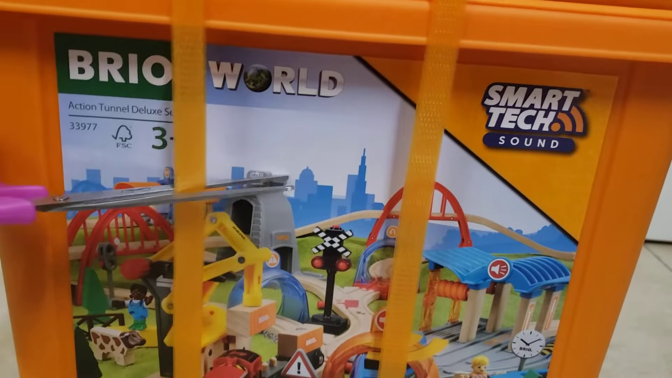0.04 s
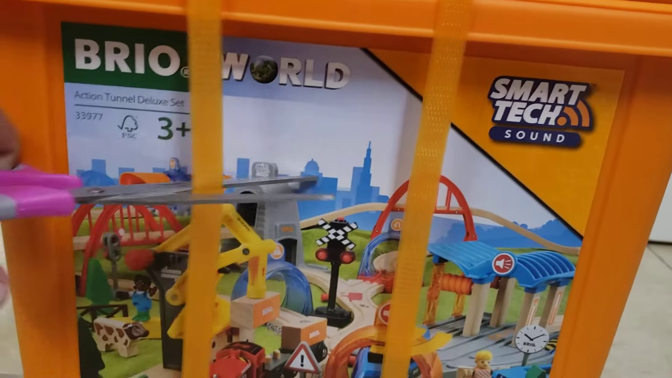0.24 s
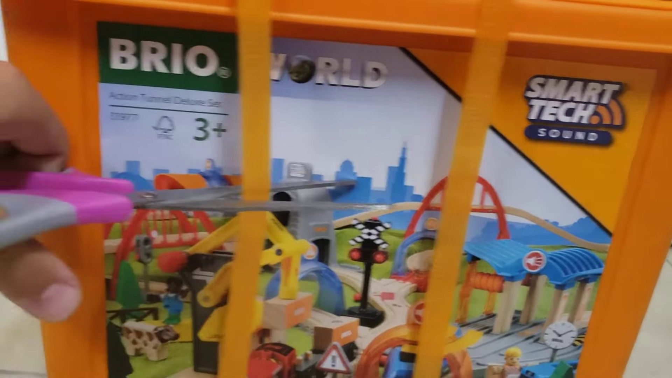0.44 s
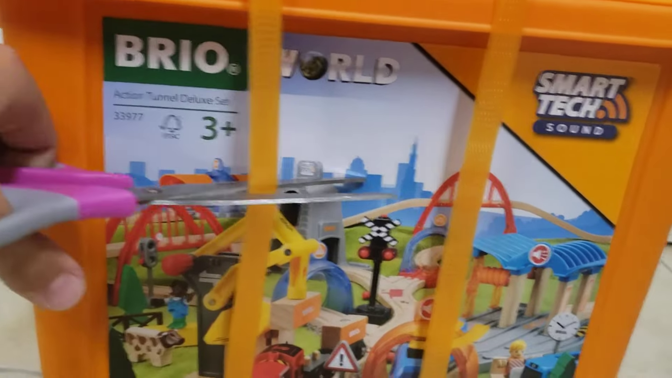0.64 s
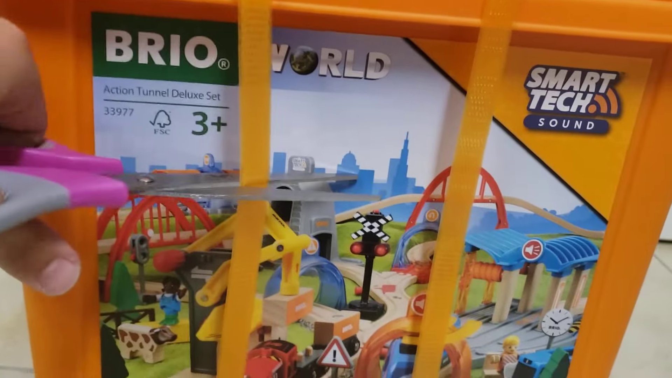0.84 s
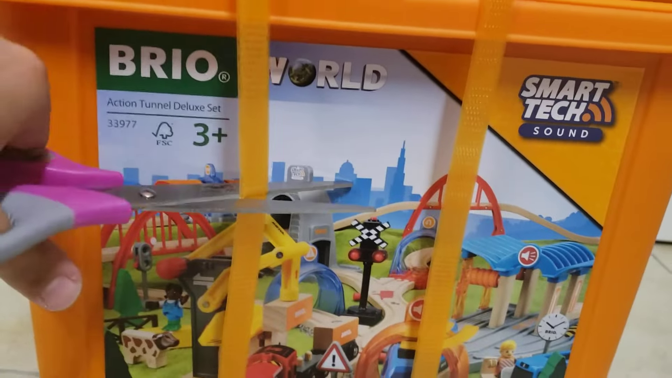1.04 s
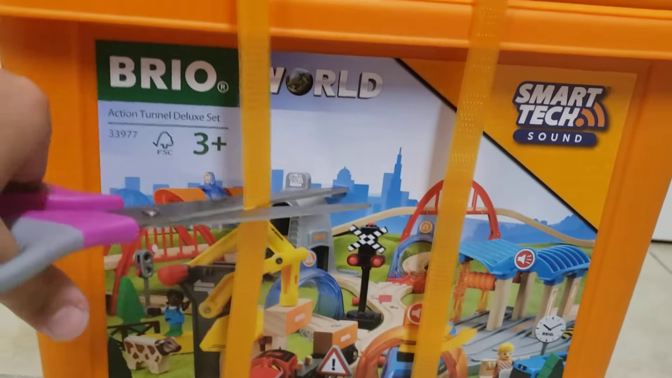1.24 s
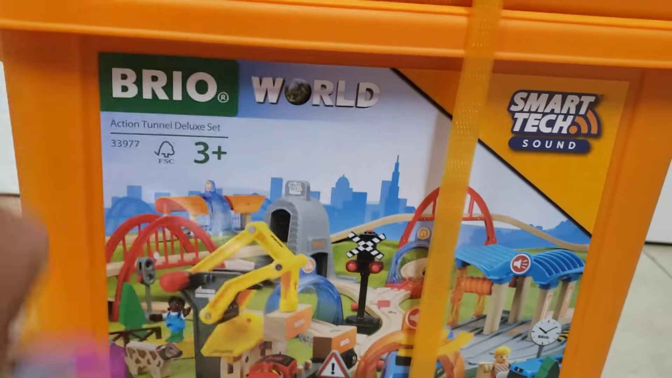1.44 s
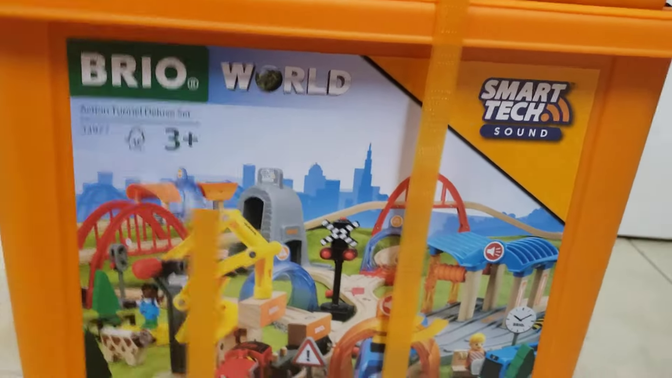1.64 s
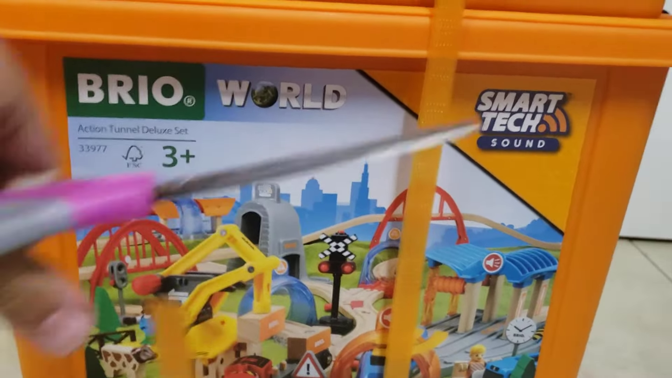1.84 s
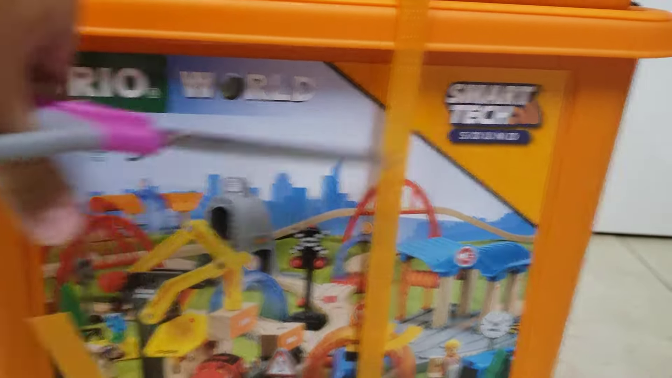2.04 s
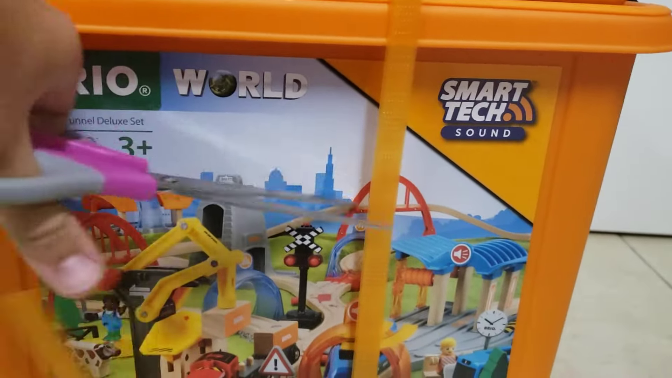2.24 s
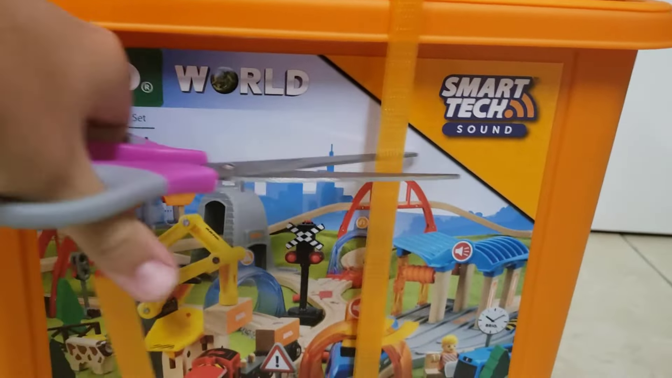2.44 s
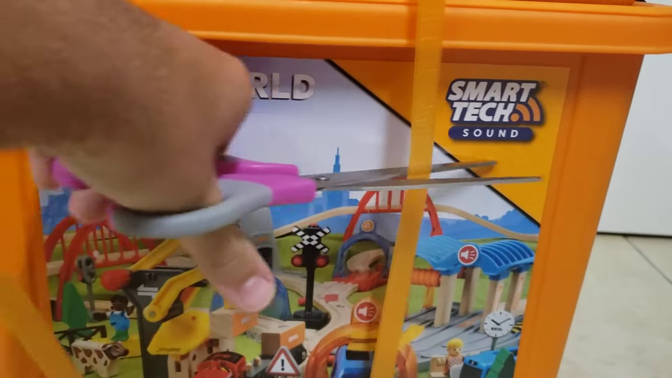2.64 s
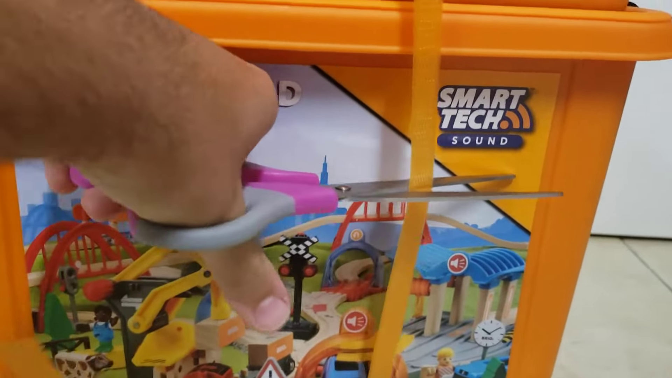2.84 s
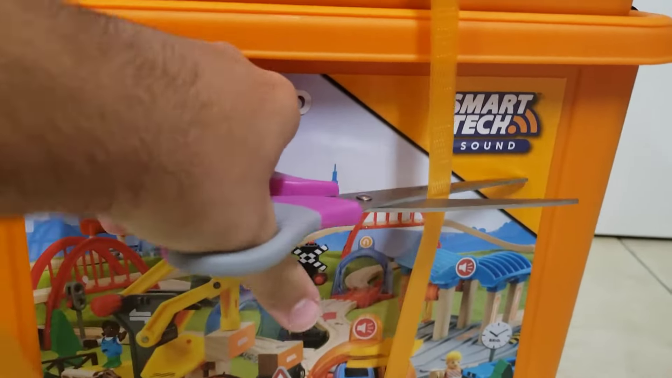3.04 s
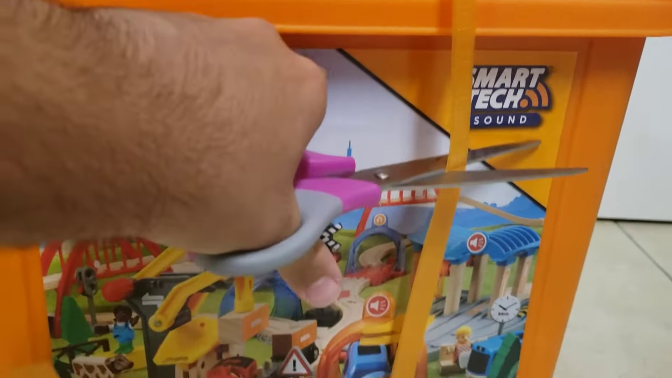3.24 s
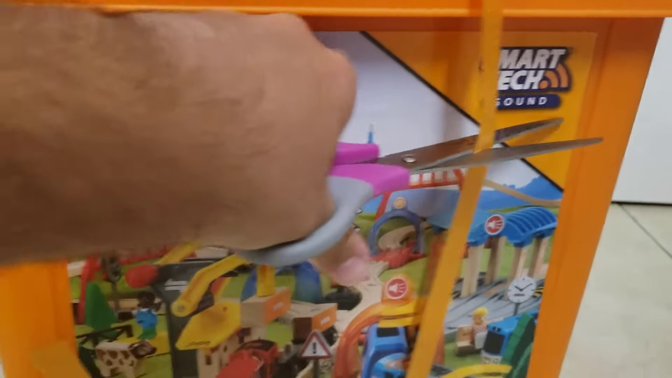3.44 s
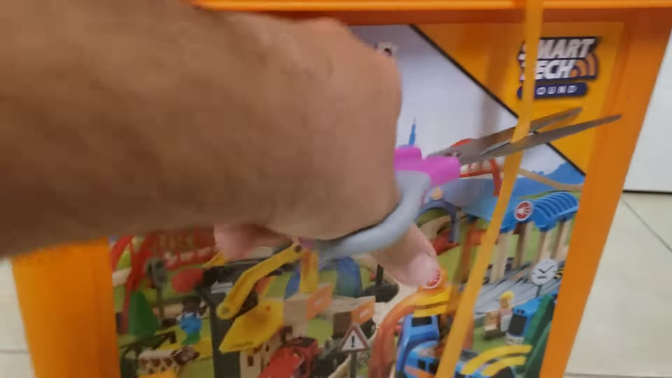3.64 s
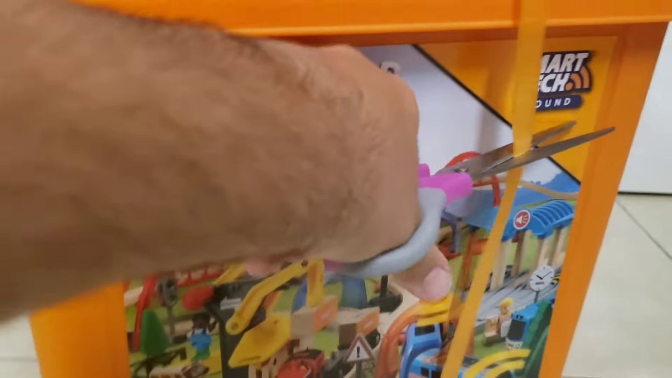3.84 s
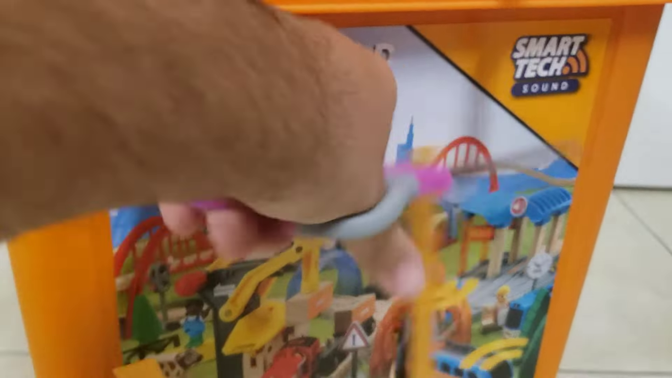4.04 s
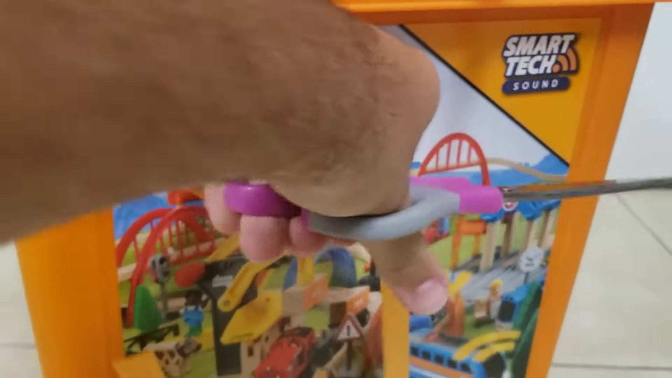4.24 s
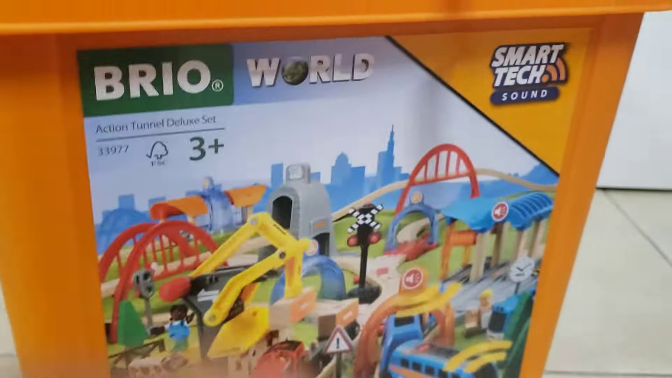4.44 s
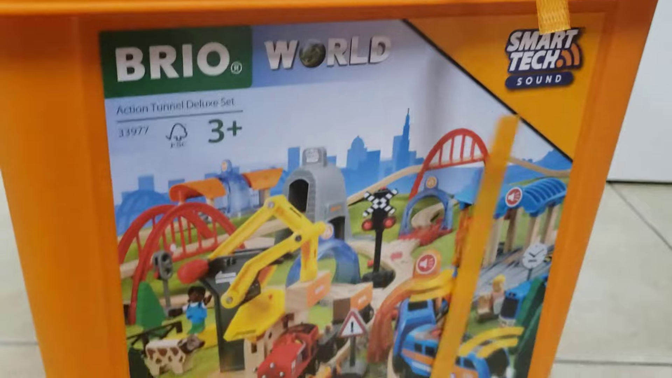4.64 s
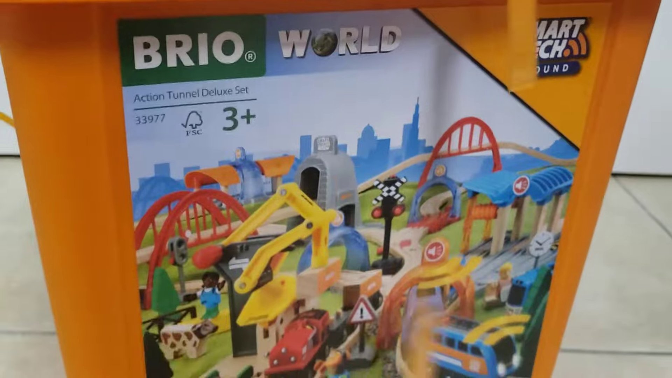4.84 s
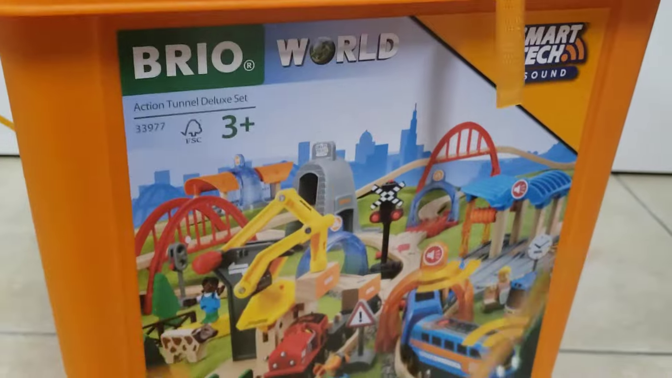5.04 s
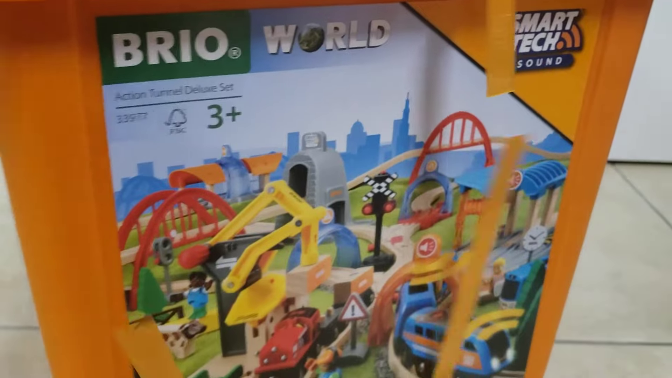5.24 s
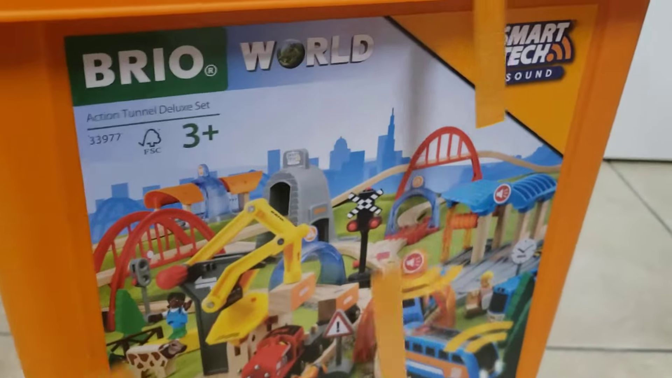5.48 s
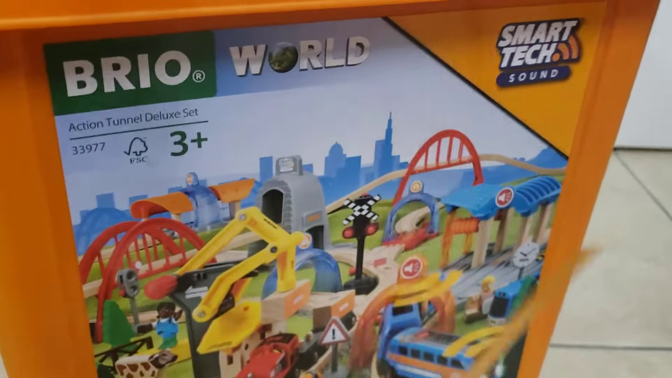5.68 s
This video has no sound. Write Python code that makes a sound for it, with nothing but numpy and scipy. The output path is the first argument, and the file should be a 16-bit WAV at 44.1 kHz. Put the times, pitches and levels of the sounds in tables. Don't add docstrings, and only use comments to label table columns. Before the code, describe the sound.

Close stereo phone pickup in a tiled room. Faint hand rubbing and small creaks on a hollow plastic box lead to a very loud strap snap with a low boom. Scissors knock and scrape quietly, a few dull bumps hit the phone, then a second sharp snap cracks. Light ticks follow, and the freed strap end rattles brightly before a soft low thump. Faint hiss continues throughout, stronger at the left.

```python
import sys
import numpy as np
from scipy import signal
from scipy.fft import rfft, irfft
from scipy.io import wavfile
from scipy.ndimage import uniform_filter1d

SR = 44100
rng = np.random.default_rng(int(sys.argv[2]) if len(sys.argv) > 2 else 0)


def materialize(psi):
    bounded = np.clip(np.atleast_2d(psi).T, -1, 1)
    quanta = np.round(bounded * 32767).astype(np.int16)
    wavfile.write(sys.argv[1], SR, quanta)


def voltage_ratio(level):
    return 10 ** (np.asarray(level, float) / 20)


N = 251798

# frequency in Hz, level in dB, t60 in seconds.
PANEL_MODES = [(231, -2.5, 0.16), (300.6, -2, 0.14), (440, 3.5, 0.026), (555.6, -2, 0.13),
               (631.4, 9.5, 0.025), (703, 8.5, 0.029), (892, 16.5, 0.014), (1138, 3, 0.05),
               (1287, -49.5, 0.0083)]
# frequency in multiples of the boom pitch, level in dB.
BOOM_PARTIALS = [(0.701, -20.5), (1.351, -3), (1.902, -7)]

# frequency in Hz, level in dB per Hz.
CRACK_SPECTRUM = [(760, -6), (1300, 8.5), (1520, 4.5), (1910, 10), (2520, 4), (3010, 0.5), (5520, -20.5),
                  (6110, -36.5), (8500, -68.5), (11000, -71), (18700, -120)]
PORT_SPECTRUM = [(5000, -34), (8500, -39), (9160, -35), (10200, -23), (11900, -6), (13500, -7), (15000, -4),
                 (15900, -8.5), (16800, -39.5)]
RUMBLE_SPECTRUM = [(12, -22), (20, -15.5), (49, 3), (86, 2), (123, 2), (204, -2.5), (350, -15),
                   (460, -60.5), (770, -120)]
RUB_SPECTRUM = [(160, -46.5), (280, -17.5), (408, 0), (493, -6.5), (667, -2.5), (811, -9), (1130, -12),
                (1400, -13.5), (1820, -76), (3080, -120)]
RUSTLE_SPECTRUM = [(880, -12), (1500, -13), (2050, -5), (3480, -0.5), (4790, -10.5), (6220, -11.5),
                   (8500, -32), (11000, -78.5), (18700, -120)]
SHUDDER_SPECTRUM = [(300, -22), (480, -10.5), (655, 0.5), (800, -8.5), (980, -4.5), (1220, -4), (1500, -15),
                    (2400, -39.5)]
WHIP_SPECTRUM = [(1200, -15.5), (1830, -4.5), (2300, -4), (3500, -2.5), (4500, -5), (5600, -10.5),
                 (6700, -13.5), (7400, -62)]
HISS_SPECTRUM = [(180, -39.5), (393, -30), (1100, -28.5), (1300, -15), (1520, -2), (1950, -5),
                 (2550, -14.5), (3450, -21.5), (3950, -22.5), (4300, -32), (5200, -40.5), (8570, -49.5),
                 (14900, -33), (16800, -48.5)]
# frequency in Hz, left minus right in dB.
HISS_BALANCE = [(60, 1.0), (110, -19), (200, -6), (380, -5.5), (700, -4), (1290, 11.5), (2380, 17),
                (4400, 11.5), (8120, 0.5), (15000, -3)]
# frequency in Hz, t60 in seconds, level in dB.
ROOM_DECAY = [(150, 0.48, -12), (485, 0.43, -9), (1500, 0.42, -11.5), (4100, 0.63, -3.5),
              (11940, 0.44, -6.5)]

# start in seconds, boom peak in dB, boom pitch in Hz, boom t60 in seconds,
# hardness as panel level above the boom in dB.
SNAPS = [
    (1.433, -2, 171.4, 0.036, -12.5),
    (4.0661, -18, 250, 0.025, 3),
    (5.4790, -21, 136, 0.056, -28),
]
TAPS = [
    (3.8293, -15, 185, 0.027, -28),
    (3.8778, -26.5, 161, 0.027, -37),
    (3.9372, -20, 150, 0.02, -29),
    (3.9944, -24, 129, 0.03, -28.5),
]
FIRST_KNOCKS = [(0.7688, -35, 135.6, 0.065, -36), (0.8052, -37.5, 191, 0.04, -36),
                (1.1221, -20, 178, 0.066, -15.5), (1.1658, -42, 198, 0.1, 0),
                (1.2233, -14, 204, 0.022, -14), (1.3148, -22, 204, 0.081, -9),
                (1.3563, -39.5, 230, 0.073, 3), (1.3808, -28.5, 239, 0.3, 1), (1.4195, -41, 252, 0.058, 8),
                (1.4511, -25, 211.4, 0.28, -4), (1.5788, -23, 182, 0.049, -14),
                (1.6893, -67.5, 230, 0.1, 26), (1.8571, -45, 76.2, 0.11, 4.5),
                (1.9832, -69.5, 74.5, 0.32, 22), (2.1217, -44.5, 199, 0.15, 0.5),
                (2.1771, -20.5, 122, 0.074, -4.5), (2.2115, -22.5, 111.5, 0.018, -6),
                (2.3011, -31.5, 259, 0.021, -9), (2.356, -47, 223.1, 0.088, 6),
                (2.5338, -29, 276, 0.026, -8), (2.6093, -45.5, 240, 0.11, -2),
                (2.7338, -48.5, 202, 0.13, -10.5)]
SECOND_KNOCKS = [(3.2348, -32.5, 111.3, 0.1, -9.5), (3.3262, -22, 171, 0.061, -14),
                 (3.3733, -21.5, 185, 0.046, -8), (3.4783, -22, 200, 0.066, -4),
                 (3.5416, -30, 200, 0.089, -0.5), (3.6342, -25.5, 118, 0.12, -7.5),
                 (3.6468, -25.5, 120.3, 0.14, -18), (3.6543, -42.5, 120, 0.079, 5),
                 (4.067, -5.5, 115.8, 0.081, -15.5)]
TOUCHES = [(3.7538, -40.5, 92.6, 0.13, -24), (3.7905, -50.5, 81, 0.092, 6.5), (3.9605, -51, 73, 0.12, 0.5),
           (4.2618, -35, 158, 0.12, -12.5), (4.3378, -39, 171, 0.15, -10), (4.4252, -46, 79, 0.17, -6.5),
           (4.5498, -44, 73.5, 0.13, -15.5), (4.6768, -49, 111, 0.15, -2.5),
           (5.0428, -27, 72.6, 0.027, -39), (5.5195, -34, 99.4, 0.16, -30),
           (5.6068, -44.5, 230, 0.05, -7.5)]
CREAKS = [(1.068, -62.5, 200, 0.039, 3), (1.1143, -59, 200, 0.044, 9), (1.2165, -56, 200, .05, 13),
          (1.2545, -39.5, 200, .05, 2), (1.309, -50, 200, .05, 11.5), (1.3348, -45, 200, .05, 8),
          (1.3765, -50.5, 200.3, 0.0554, 10.5), (2.716, -47.5, 191, 0.2, -12),
          (2.803, -48.5, 200, 0.11, -17), (2.832, -50.5, 200, 0.094, -8), (2.856, -47, 216, 0.29, -8),
          (2.915, -46.5, 200.6, 0.079, -20), (3.11, -61.5, 200, 0.047, 12.5), (3.272, -63.5, 184, .05, 16),
          (3.2998, -61.5, 190, .05, 7), (3.32, -43, 151.7, 0.059, -3.5), (3.365, -54, 190, 0.053, 1),
          (3.4648, -57, 190, .05, 9), (3.4755, -65, 190, 0.045, 11), (3.5385, -50, 190, 0.052, 13),
          (3.6305, -50, 190, 0.046, 11.5), (3.693, -54, 190, 0.052, 10), (4.0632, -27.5, 249, 0.04, 2.5),
          (0.168, -48, 201, 0.076, -2), (0.2, -42, 402, .08, -13), (0.298, -50.5, 290, 0.075, -6),
          (1.4238, -35.5, 252, .04, 11), (1.462, -25, 279, 0.19, -17), (2.322, -53.5, 220, .05, 7),
          (2.336, -51.5, 220, 0.048, 8), (4.477, -58, 199.7, 0.051, 2), (5.53, -49.5, 486, 0.092, 1.5),
          (5.562, -53.5, 300, 0.082, -7), (3.821, -40.5, 260, .03, -16), (3.868, -43, 200, 0.033, -18),
          (4.0035, -30, 170, 0.034, -22), (2.128, -44, 260, .04, -9), (4.135, -32, 105.4, 0.18, -22),
          (1.19, -46.5, 200, .05, 0.5), (3.608, -36.5, 180, .06, -19.5), (3.29, -54, 190, .05, 3.5)]

# start in seconds, treble peak in dB, body above treble in dB, length in ms.
FIRST_TICKS = [(1.1221, -40, -10, 0.75), (1.2233, -49.5, 3, 2.3), (1.3153, -61, 8, 1.3),
               (1.38, -40, -2, 1.4), (1.4192, -57, 7, 1.2), (1.4241, -37, -13, 4.3),
               (1.4281, -47.5, 6, 0.94), (1.4334, 0, -4.5, 0.62), (1.4405, -25.5, 6, 3),
               (1.8526, -43.5, 2.5, 0.88), (2.1113, -51, 19.5, 1.2), (2.1238, -46, -1, 0.74),
               (2.1317, -66.5, 14, 1.4), (2.1774, -42.5, 10.5, 0.57), (2.2118, -52.5, 15.5, 0.61),
               (2.3456, -52, 15.5, 2.1), (2.3974, -61, 24.5, .5), (2.6038, -45.5, 1, 2.4),
               (2.7836, -46, -4, 0.33)]
SECOND_TICKS = [(3.3741, -49, 3, 0.38), (3.4789, -41.5, -0.5, 1.3), (3.5437, -34, 0.5, 0.55),
                (3.6186, -39, 2, .5), (3.635, -38, 2, 1.3), (3.7906, -50.5, 7, 1.0), (3.8245, -54, 8, 1.6),
                (3.8298, -33.5, -3, 0.31), (3.9371, -41.5, -9, 1.1), (3.9606, -45.5, -8, .5),
                (3.9348, -54, 8, 0.46), (3.9498, -48, 2, .5), (3.6112, -51, 3, 0.43),
                (4.0663, -3, -9, 0.38), (4.0722, -25, 1, 2.2), (4.2621, -29, -3.5, 1.2),
                (4.339, -35.5, 2, 0.76), (4.4232, -37, -6, .5), (4.4447, -48.5, 4, 0.36),
                (4.5228, -39, 8.5, 0.52), (4.6757, -39, -4, 0.62), (4.7101, -47.5, 5.5, 1.4),
                (4.8073, -49.5, -5, .5)]
# start in seconds, treble peak in dB, body above treble in dB.
RATTLE = [(5.0484, -16.5, -7.5), (5.0571, -30, 3.5), (5.0608, -24, -10), (5.0811, -30, 7.5),
          (5.0866, -37.5, 12), (5.093, -10, -12), (5.1025, -22, -14), (5.107, -34, -11), (5.127, -4, -9.5),
          (5.1354, -28, -7), (5.138, -38, -9), (5.1555, -1.5, -16), (5.1642, -23, -12), (5.1642, -8, -11),
          (5.1727, -19.5, 2), (5.188, -23, -0.5), (5.1936, -20, -6), (5.2016, -27, -6),
          (5.2086, -17.5, -8.5), (5.217, -33, -15), (5.2502, -38, -1), (5.2664, -31.5, 7),
          (5.2732, -24, -5), (5.2776, -10, -22.5), (5.2797, -13.5, -14.5), (5.2796, -26.5, -29),
          (5.285, -23.5, -8), (5.2904, -40, -13), (5.2954, -25.5, -5), (5.3196, -21.5, -1.5),
          (5.3224, -20.5, -5), (5.3251, -25.5, -13), (5.3301, -40, -15), (5.3372, -35, -3),
          (5.3459, -20, -15), (5.3473, -23.5, -21), (5.3698, -22.5, -24), (5.3756, -27, -6.5),
          (5.3914, -28, 1.5), (5.432, -23.5, -26), (5.441, -34, -16), (5.446, -47.5, -14),
          (5.6104, -44, -8), (5.6995, -46, 5)]
# start in seconds, frequency in Hz, peak in
# dB, t60 in seconds.
SQUEAKS = [(2.177, 323, -19, 0.015), (3.633, 675, -22, 0.025), (4.0662, 2980, -10.5, 0.011),
           (4.0661, 4100, -18, 0.0063), (1.4405, 3000, -23, 0.008), (2.1785, 3150, -32, 0.008),
           (2.212, 2700, -37, 0.006), (3.79, 2400, -36.5, 0.009), (4.574, 5000, -49.5, 0.016),
           (4.436, 4300, -56, 0.013), (3.9605, 1700, -43, 0.007), (4.587, 4780, -53, 0.013),
           (4.463, 1160, -44.5, 0.031), (5.1715, 3200, -30, 0.012)]
# start in seconds, peak in dB.
PATTER = [(4.462, -57), (4.484, -47), (4.507, -53), (4.545, -48), (4.595, -57), (4.676, -53.5),
          (4.715, -52.5)]

# start in seconds, level in dB, t60 in seconds, whip above shudder in dB.
SHUDDERS = [(1.436, -33, .32, 1.5), (4.068, -34.5, 0.31, -8), (2.302, -54, .5, -15),
            (4.43, -59.5, 1.2, -10.5), (.44, -70, 1.5, -9.5), (2.87, -70.5, 2.5, -31.5),
            (5.05, -67.5, .3, 8.5), (3.485, -53, .35, -20), (3.65, -54.5, .5, -20.5),
            (2.346, -67, 0.18, 11.5), (3.38, -57.5, .3, -20)]
# moment of most pressure in seconds, rub level in dB,
# rise in seconds, fall in seconds, rumble above rub in dB.
STROKES = [(0.02, -55, 0.59, 0.11, 9.5), (0.2, -54.5, 0.11, 0.11, 10.5), (0.3, -56.5, 0.033, 0.37, 6),
           (0.54, -57, 0.25, 0.31, -5), (0.79, -61, 0.52, 0.017, 14.5), (0.93, -84, 0.22, 0.27, 33),
           (1.068, -75.5, 0.029, .05, 27), (1.288, -52, 0.23, 0.23, 7.5), (1.7, -57, 0.22, 0.19, -11),
           (1.88, -47, 0.046, 0.071, -16.5), (2.2, -67.5, 0.54, 0.29, 21), (2.62, -59.5, 0.74, 0.58, 7.5),
           (3.12, -58.5, 0.21, 0.36, -21), (3.63, -55, 0.32, 0.36, 7.5), (3.85, -74, 0.64, 0.61, 23.5),
           (4.356, -58.5, 0.1, 0.1, 11), (4.432, -56.5, 0.016, 0.22, -6), (4.678, -61.5, 0.012, 0.21, -13),
           (4.83, -66, 0.27, 0.29, 9), (5.098, -60, 0.1, 0.73, -11), (5.38, -80, .06, .06, 23),
           (5.71, -59.5, 0.5, .1, 0)]
# moment of most speed in seconds, rustle level in dB,
# rise in seconds, fall in seconds, sizzle above rustle in dB.
SLIDES = [(0.0, -59.5, .1, 0.045, -11), (0.542, -75.5, 0.12, 0.42, -6), (1.3, -75, 0.57, 0.89, -3),
          (1.7, -62, 0.64, 0.27, -21), (1.88, -63, 0.37, 0.1, -2.5), (2.3, -78, 0.19, 0.81, -6),
          (2.6, -66, 0.16, 0.14, -2), (3.5, -69.5, 0.063, 0.33, -7), (3.69, -65, 0.077, 0.097, -2),
          (3.77, -87, .4, 0.13, 18), (4.356, -62.5, 0.21, 0.063, 1.5), (4.432, -59.5, 0.02, 0.14, 1),
          (4.678, -68.5, 0.03, 0.11, 1), (5.218, -58, 0.093, 0.13, -1), (5.314, -54, 0.15, 0.077, -7),
          (5.71, -63, 0.22, .1, -5)]

WALL_PORTS_DB, CASE_PORTS_DB = (1, -0.3, -3), (-11.5, 5, -11)
SNAP_PORTS_DB = (-1.5, -1, 1.5)
SQUEAK_PORTS_DB = (1, -1.5, -9)
LEFT_LAG = -9
LEAD = 256


def read(table, hz):
    f, v = np.transpose(table)
    return np.interp(np.log(hz + 1), np.log(f), v)


def ring(hz, t60, t):
    return np.sin(2 * np.pi * hz * t) * np.exp(-np.log(1000) * t / t60)


def peak(x, db):
    return x * voltage_ratio(db) / np.max(np.abs(x))


def add(track, s, x):
    i = int(s * SR)
    track[..., i:i + x.shape[-1]] += x[..., :N - i]


def struck(x, table):
    n = x.shape[-1]
    hz = np.fft.rfftfreq(n, 1 / SR) + 1
    low_edge = np.minimum(hz / table[0][0], 1) ** 4
    high_edge = np.minimum(table[-1][0] / hz, 1) ** 60
    gain = voltage_ratio(read(table, hz)) * low_edge * high_edge
    cepstrum = irfft(np.log(gain / np.sqrt(np.mean(gain ** 2))), n)
    cepstrum[1:n // 2] *= 2
    cepstrum[n // 2 + 1:] = 0
    return irfft(rfft(x) * np.exp(rfft(cepstrum)), n)


def burst(length, table):
    t = (np.arange(2048) - LEAD) / SR
    noise = rng.standard_normal((3, 2048))
    noise[0, LEAD] = 9.8
    chatter = 0.62 * np.exp(-np.abs(t) / 0.0033)
    fade = (np.exp(-np.abs(t) / max(length, 1e-4)) + chatter) * (t >= 0)
    ports = struck((noise[0] + 2.35 * noise[1:]) * fade, table)
    click = struck(1. * (t == 0), table)
    room_click = np.sqrt(np.sum(ports ** 2) / 2) * click
    return np.vstack([ports, room_click]) / np.max(np.abs(ports.mean(0)))


def knocks(table, swing, ports_db, damping, crack_db):
    out, t = np.zeros((3, N)), np.arange(SR // 4) / SR
    push = np.hanning(int(0.0016 * SR))
    crack_pan_db = 8 * np.array([[.5], [-.5], [0]])
    for s, db, hz, t60, panel_db in table:
        level_chance, pitch_chance = rng.standard_normal((2, len(PANEL_MODES)))
        t60 = np.clip(t60, .02, .25)
        boom = ring(hz, t60, t)
        for ratio, partial_db in BOOM_PARTIALS:
            boom = boom + voltage_ratio(partial_db) * ring(ratio * hz, 0.54 * t60 * damping, t)
        boom = boom * (1 - 0.67 * np.exp(-t * hz / 0.51))
        panel = 0
        for (f, mode_db, mode_t60), a, c in zip(PANEL_MODES, level_chance, pitch_chance):
            panel = panel + voltage_ratio(mode_db + 3 * a) * ring(f * (1 + .05 * c), mode_t60 * damping, t)
        panel = panel * (1 - 0.74 * np.exp(-t / 0.00066))
        panel = peak(swing * np.convolve(panel, push[::3]), db + panel_db + 7.0)
        add(out, s - .0008, peak(swing * np.convolve(boom, push), db + 0.5))
        add(out[:2], s, panel)
        add(out[2], s, 2.65 * panel[:len(t)] * np.exp(-t / 0.0014))
        crack_gain = voltage_ratio(db + panel_db + crack_db + 3.0 + crack_pan_db)
        add(out, s - LEAD / SR, burst(0.0043, CRACK_SPECTRUM) * crack_gain)
    return out * voltage_ratio(np.array(ports_db))[:, None]


def box_blows():
    snaps = knocks(SNAPS, 1, SNAP_PORTS_DB, 0.93, crack_db=4)
    taps = knocks(TAPS, -1, CASE_PORTS_DB, 1.0, crack_db=7.5)
    first = knocks(FIRST_KNOCKS, -1, WALL_PORTS_DB, 0.96, crack_db=-5.5)
    second = knocks(SECOND_KNOCKS, -1, WALL_PORTS_DB, 0.96, crack_db=-12.5)
    touches = knocks(TOUCHES, -1, WALL_PORTS_DB, 0.96, crack_db=3.5)
    creaks = knocks(CREAKS, 1, WALL_PORTS_DB, 0.61, crack_db=-8)
    return snaps + taps + first + second + touches + creaks


def ticks():
    out = np.zeros((3, N))
    rattle = [(*row, 0.49) for row in RATTLE]
    for table, place_db in (FIRST_TICKS, 1), (SECOND_TICKS, -2), (rattle, 7):
        for s, db, body_db, ms in table:
            pan_db = place_db + 0.074 * body_db
            length = ms / 1000
            sides = voltage_ratio(np.array([[pan_db], [-pan_db], [0]]) / 2)
            add(out, s - LEAD / SR, burst(length, PORT_SPECTRUM) * voltage_ratio(db - 3.5) * sides)
            add(out, s - LEAD / SR, burst(6.8 * length, RUSTLE_SPECTRUM) * voltage_ratio(db + body_db - 8.5) * sides)
    return out


def squeaks():
    out, t = np.zeros((3, N)), np.arange(2048) / SR
    patter = [(s, 675, db - 0.5, 0.037) for s, db in PATTER]
    for s, hz, db, t60 in SQUEAKS + patter:
        rough = 1 + 0.1 * 5 * uniform_filter1d(rng.standard_normal(len(t)), size=40)
        onset = np.clip(t / (0.098 * t60), 0, 1)
        mode = peak(ring(hz, t60, t) * onset * rough, db) * voltage_ratio(np.array(SQUEAK_PORTS_DB))[:, None]
        add(out[0], s - LEFT_LAG / SR, mode[0])
        add(out[1:], s, mode[1:])
    return out


def colour(x, table):
    hz = np.fft.rfftfreq(x.shape[-1], 1 / SR)
    gain = voltage_ratio(read(table, hz)) * (hz >= table[0][0]) * (hz <= table[-1][0])
    return irfft(rfft(x) * gain / np.sqrt(np.mean(gain ** 2)), x.shape[-1])


def pair(alike):
    mid, side = rng.standard_normal((2, N))
    alike = np.clip(alike, 0, 1)
    return np.sqrt((1 + alike) / 2) * mid + np.sqrt((1 - alike) / 2) * side * np.array([[1], [-1]])


def flicker(rate, db):
    k = int(SR / rate)
    steps = np.repeat(rng.standard_normal(N // k + 1), k)[:N]
    return voltage_ratio(db * uniform_filter1d(steps, k))


def grains(rate, spread_db):
    noise = pair(.3)
    slips = (rng.random(N) < rate / SR) * voltage_ratio(spread_db * rng.exponential(size=N))
    x = noise + slips * pair(.4) * 3
    return x / np.sqrt(np.mean(x ** 2))


def shudders():
    t = np.arange(N) / SR
    wall = whip = 0
    for s, db, t60, whip_db in SHUDDERS:
        fade = voltage_ratio(db - 60 * np.abs(t - s) / max(t60, .05)) * np.clip((t - s) / .004, 0, 1)
        wall = wall + fade
        whip = whip + fade * voltage_ratio(whip_db)
    wall_noise = colour(wall * flicker(60, 3.0) * grains(250, 3.0), SHUDDER_SPECTRUM)
    whip_noise = colour(whip * flicker(90, 2.5) * grains(700, 2.5), WHIP_SPECTRUM)
    return wall_noise + whip_noise


def swells(table):
    t = np.arange(N) / SR
    first = second = 0
    for s, db, rise, fall, above_db in table:
        distance = np.where(t < s, (s - t) / max(rise, .01), (t - s) / max(fall, .01))
        swell = voltage_ratio(db - 20 * distance)
        first = np.maximum(first, swell)
        second = np.maximum(second, swell * voltage_ratio(above_db))
    return first, second


def motion():
    rub, rumble = swells(STROKES)
    rustle, sizzle = swells(SLIDES)
    rumble = np.maximum(rumble, voltage_ratio(-61))
    hand = rumble * flicker(14, 3.0) * colour(pair(.93), RUMBLE_SPECTRUM)
    hand = hand + rub * flicker(22, 2.5) * colour(grains(150, 3.8), RUB_SPECTRUM)
    strap = rustle * colour(grains(599, 1.4), RUSTLE_SPECTRUM)
    return hand + strap + sizzle * colour(grains(400, 2.7), PORT_SPECTRUM)


def room():
    t, tail = np.arange(SR) / SR, 0
    f, t60, db = np.transpose(ROOM_DECAY)
    for hz in 60 * 2. ** np.arange(9):
        band = [hz / 2 ** .5, min(hz * 2 ** .5, .45 * SR)]
        sos = signal.butter(2, band, "band", fs=SR, output="sos")
        decay = read(list(zip(f, t60)), hz)
        level_db = read(list(zip(f, db)), hz)
        noise = signal.sosfilt(sos, pair(.98 - hz / 2500)[:, :SR])
        tail = tail + noise * voltage_ratio(level_db - 60 * t / decay) / np.sqrt(decay * SR / 14)
    early = 1 + voltage_ratio(9.5) * np.exp(-t / 0.0063)
    return tail * np.clip(t / 0.0078, 0, 1) * early


def hiss():
    hz = np.fft.rfftfreq(N, 1 / SR)
    sides = voltage_ratio(np.outer([.5, -.5], read(HISS_BALANCE, hz)))
    return voltage_ratio(-61.5) * irfft(rfft(colour(pair(0.094), HISS_SPECTRUM)) * sides, N)


def scene():
    box, edges = box_blows(), ticks() + squeaks()
    left = np.roll(box[0] + edges[0], LEFT_LAG)
    direct = np.array([left, box[1] + edges[1]])
    steady = motion() + shudders() + hiss()
    for source in (box[2], voltage_ratio(-2.0) * edges[2]):
        steady = steady + signal.fftconvolve(source[None], room(), axes=1)[:, :N]
    lowpass = signal.ellip(8, .2, 70, 15800, fs=SR, output="sos")
    return direct + signal.sosfilt(lowpass, steady)


def band_limit(x):
    return signal.sosfilt(signal.butter(12, 16970, fs=SR, output="sos"), x)


def record(dry):
    highpass = signal.butter(3, 48, "high", fs=SR, output="sos")
    cut = signal.sosfilt(highpass, dry)
    mix = np.tanh(0.89 * cut) / 0.96
    return band_limit(mix)


dry = scene()
out = record(dry)
materialize(out)
```